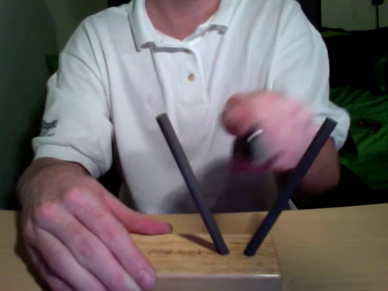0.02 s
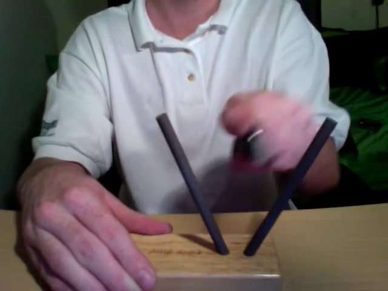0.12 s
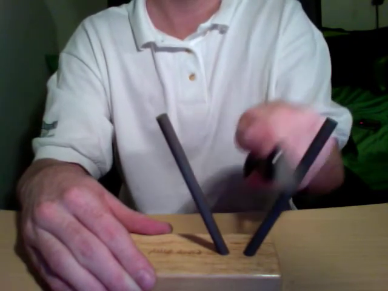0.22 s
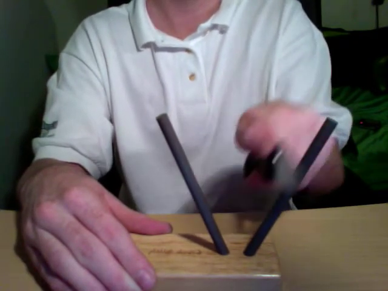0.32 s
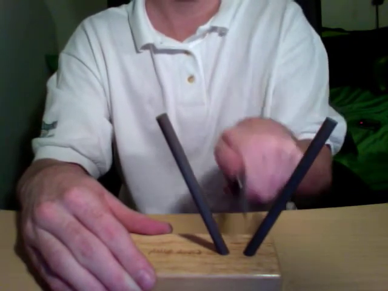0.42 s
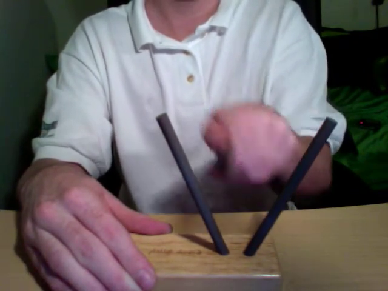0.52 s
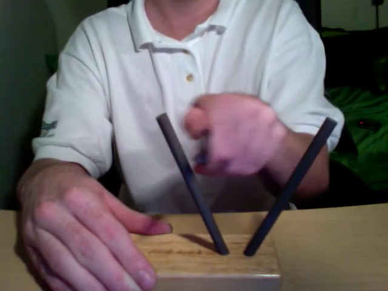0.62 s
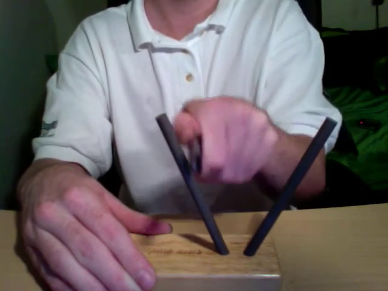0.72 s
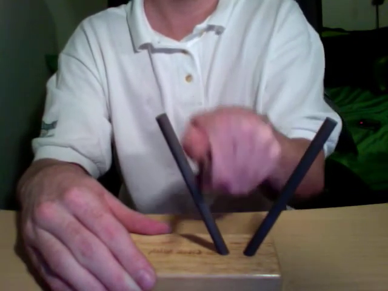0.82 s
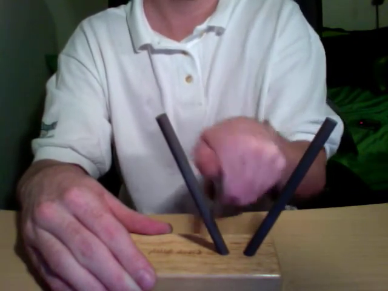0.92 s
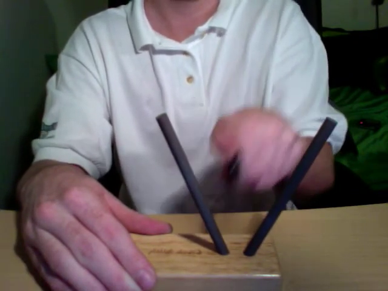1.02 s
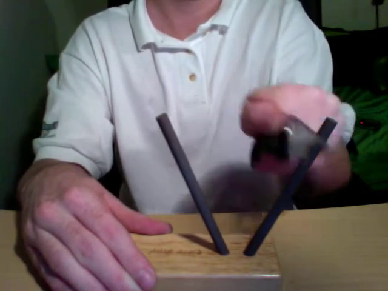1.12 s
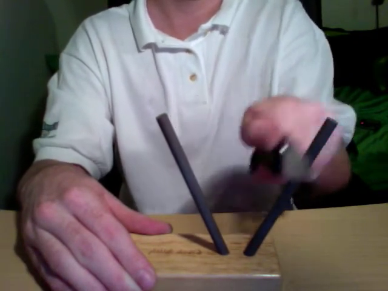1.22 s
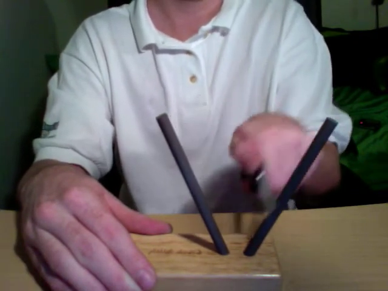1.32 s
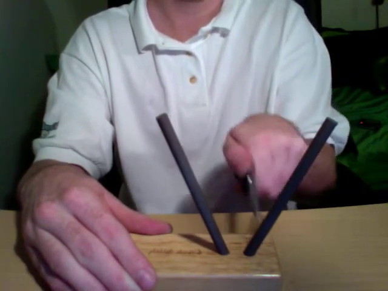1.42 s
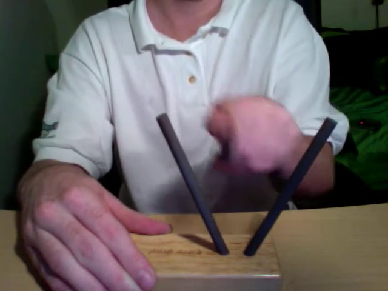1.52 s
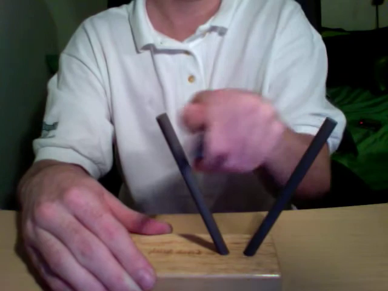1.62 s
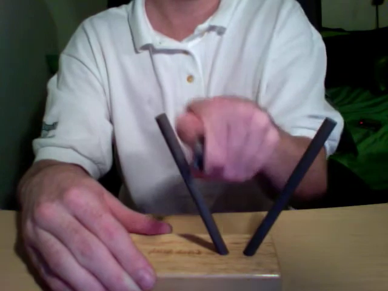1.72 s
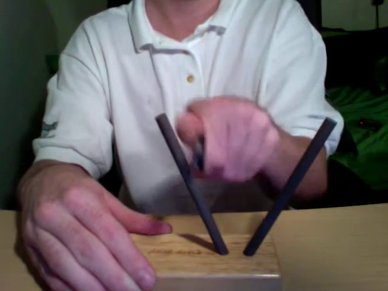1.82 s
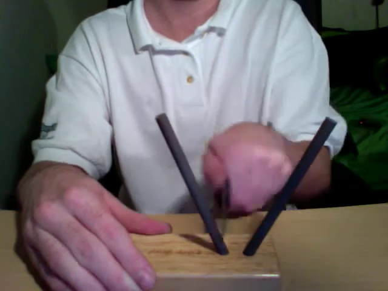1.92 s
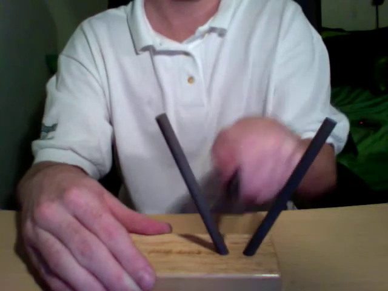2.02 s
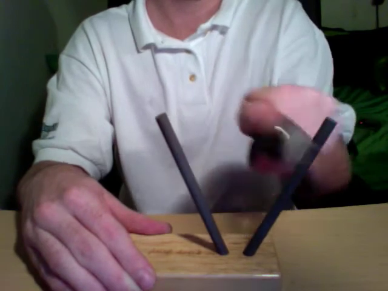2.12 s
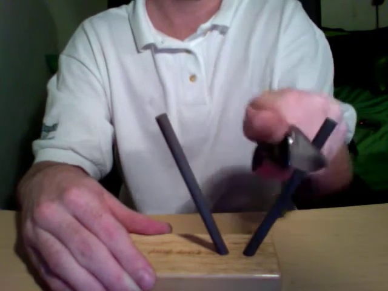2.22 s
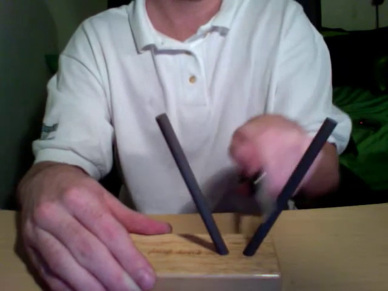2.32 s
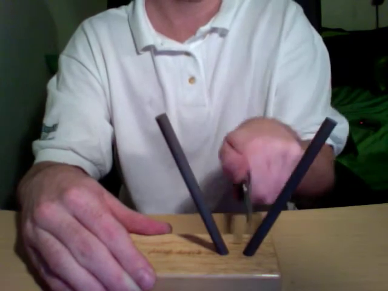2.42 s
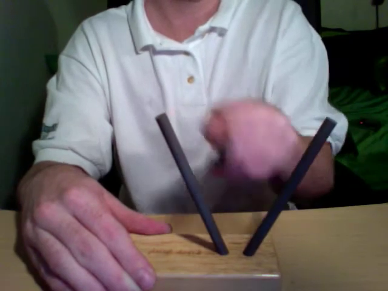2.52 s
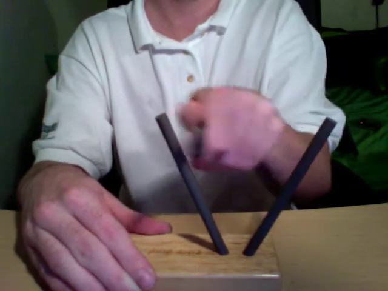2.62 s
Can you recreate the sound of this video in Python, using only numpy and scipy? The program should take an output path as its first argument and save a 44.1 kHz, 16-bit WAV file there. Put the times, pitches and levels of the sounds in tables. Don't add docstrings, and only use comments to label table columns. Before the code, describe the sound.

Close in a small room with faint hum, a knife clicks onto a ceramic rod, scrapes down with a brightening metallic song, lifts, then repeats on the other rod, right strokes harder than left.

```python
import sys
import numpy as np
from scipy import signal
from scipy.fft import rfft, irfft, next_fast_len
from scipy.io import wavfile
from scipy.ndimage import uniform_filter1d, map_coordinates

SR = 44100
rng = np.random.default_rng(int(sys.argv[2]) if len(sys.argv) > 2 else 0)


def to_linear_factor(level_db):
    exponent = np.asarray(level_db, float) / 20
    return 10 ** exponent


def int16_out(signal):
    q = np.round(np.clip(np.atleast_2d(signal).T, -1, 1) * 32767)
    wavfile.write(sys.argv[1], SR, q.astype(np.int16))


N = 119070
LEAD = SR // 4
M = N + LEAD
T_S = (np.arange(M) - LEAD) / SR

# hz, db_per_hz
AIR_COLOUR = [(40, -27.5), (120, 0.5), (240, 0), (400, -5.5), (650, -1.5), (1100, -11.5), (3200, -20),
              (16000, -42)]
AIR_DB = -74
HUM_HZ, HUM_WIDTH_HZ, HUM_DB = 231, 24, -74
# hz, t60_s
ROOM_DECAY = [(200, .3), (2000, 0.23), (6000, .2), (14000, 0.17)]
ROOM_DB = -11

# start_s, peak_db, block_thump_db
LANDINGS = [
    (.2262, -2.5, -13),
    (.7133, -13, -17),
    (1.2212, -6, -12.5),
    (1.7036, -9.5, -12),
    (2.2312, -2.5, -15.5),
]
# delay_s, level_db
RETOUCHES = [
    [(.0008, 9), (.019, -35)],
    [(.0021, 9), (.018, -19)],
]
# pitch_hz, level_db, t60_s
STRUCK_MODES = [
    [(809, -10.5, 0.035), (1430, -13, .008), (1644, -4, 0.015), (1790, -4, .012), (2712, -2, .016),
     (3935, -1.5, 0.011), (4194, 0, 0.011), (4850, -4.5, 0.0081), (6270, -23, 0.024), (8870, -17.5, .006)],
    [(650, -16.5, 0.042), (833, -14, 0.048), (1910, -15, 0.029), (1780, -3, 0.021), (2700, -8, 0.038),
     (3370, -11.5, 0.02), (4030, -8, 0.011), (5480, 8.5, 0.0023), (6690, -8, 0.0039), (9400, -14, 0.0085)],
]
# pitch_hz, level_db, t60_s
BLOCK_MODES = [(150, -9, 0.03), (180.5, -1.5, 0.081), (215, -7.5, 0.081), (305, -9, 0.068),
               (458, -13, 0.043)]

# time_s, rasp_level_db, blade_song_over_rasp_db, rod_drone_over_rasp_db
STROKES = [
    [(.246, -42.5, 1.5, 10), (.31, -45.5, 6.5, -4), (.345, -46.5, 12.5, 8), (.375, -46, 18, 1.5),
     (.42, -54, 18.5, 22.5), (.464, -52.5, 10.5, 6)],
    [(.732, -46, -1, 1), (.76, -49, 5.5, 14.5), (.81, -53.5, 12.5, 12.5), (.85, -53, 19, 15),
     (.9, -55, 20, 19), (.95, -61.5, 20, 16)],
    [(1.24, -46, 12, 12), (1.27, -50.5, 12.5, 4), (1.35, -47.5, 9.5, 11.5), (1.4, -52.5, 22.5, 8),
     (1.43, -49, 10.5, 5), (1.452, -53.5, 8.5, 10.5)],
    [(1.724, -44.5, -10, 6), (1.76, -49, -5, -12), (1.8, -51.5, 9, 12), (1.89, -49.5, 20, 6.5),
     (1.94, -54.5, 18.5, 15.5), (1.975, -59, 16.5, 20.5)],
    [(2.25, -50.5, -3, 15.5), (2.3, -44, 10, -1.5), (2.35, -48.5, 7.5, 7.5), (2.41, -48, 20.5, 7.5),
     (2.44, -51.5, 15.5, 7.5), (2.463, -49, 1.5, 4.5)],
]
# pitch_hz, width_hz, level_db
RUBBED_MODES = [
    [(657.7, 99, -8.5), (814.6, 210, -4), (1129.5, 27, -12.5), (2690, 40, -4.5), (3200, 220, -30),
     (4150, 100, -4.5), (5267, 740, -4.5), (5860, 190, -9.5), (8180, 300, -15), (8720, 670, -14)],
    [(384, 100, -13.5), (616, 40, -15.5), (845, 175, -2.5), (1093, 76, -15), (3123, 75, -12),
     (3647, 250, -15), (5430, 440, -17), (6600, 600, -9), (9140, 170, -29)],
]
# pitch_hz, width_hz, level_db
BLADE_MODES = [(1706, 150, -8), (1770, 52, 0.5), (1880, 170, -0.5), (2130, 210, 0.5), (2450, 130, 0),
               (2660, 140, -3)]
# stroke_share, centre_hz
SONG_CLIMB = [
    [(0, 1390), (.5, 1648), (.8, 2450), (1, 2700)],
    [(0, 1680), (.62, 1623), (1, 2294)],
]
# pitch_hz, width_hz, level_db
TIP_FIZZ = [(8880, 900, -9.5), (13600, 1700, -11.5)]
# hz, db_per_hz
GRIT_COLOUR = [(110, -35), (230, -3.5), (1500, -12.5), (4300, -4), (6500, -17), (10000, -20.5),
               (13000, -22.5), (16000, -31.5)]
# hz, db_per_hz
SWELL_COLOUR = [(250, -31), (600, -7), (1300, -8), (2200, -0.5), (3800, -10), (5000, -26.5), (8000, -64)]
GRIT_DB, SWELL_DB = 1.5, -4.5
CLIMB_OCTAVES, CLIMB_FLOOR_DB = .13, -14
TIP_FROM_SHARE, TIP_SONG_DB = 0.82, 1
DRONE_TOP_HZ, SONG_BAND_HZ = 1300, (3000, 4000)
SKIP_S, SKIP_DB = 0.045, -4
LIFT_S = 0.0066
EARLIER_END_S, EARLIER_DB = 0.0015, -49.5
LEAST_WIDTH = .045
MIC_LOW_HZ, MIC_TOP_HZ = 115, 15700


def unit(x):
    return x / np.sqrt(np.mean(x ** 2) + 1e-20)


def along(points, hz):
    point_hz, value = np.transpose(points)
    return np.interp(np.log(hz + 1), np.log(point_hz + 1), value)


def wobble(rate_hz):
    knots = rng.standard_normal(int(M * rate_hz / SR) + 4)
    return map_coordinates(knots, [np.arange(M) * rate_hz / SR])


def coloured(x, spectrum):
    size = next_fast_len(M + 8192)
    gain = to_linear_factor(along(spectrum, np.fft.rfftfreq(size, 1 / SR)))
    return irfft(rfft(x, size) * gain, size)[:M]


def mode(x, hz, width_hz):
    width_hz = max(width_hz, LEAST_WIDTH * min(hz, 4000))
    b, a = signal.iirpeak(hz, hz / (1.5 * width_hz), SR)
    twice = signal.lfilter(b, a, signal.lfilter(b, a, x))
    return twice / np.sqrt(.75 * np.pi * width_hz / SR)


def air():
    hiss = unit(coloured(rng.standard_normal(M), AIR_COLOUR))
    hum = mode(rng.standard_normal(M), HUM_HZ, HUM_WIDTH_HZ)
    return to_linear_factor(AIR_DB + 1.2 * wobble(8)) * hiss + to_linear_factor(HUM_DB) * hum


def room(x):
    out, step = np.zeros(M + 2 * SR), SR // 16
    for i in range(0, M, step):
        hz, t, z = signal.stft(rng.standard_normal(SR // 2), SR, nperseg=256)
        decay = to_linear_factor(-60 * t / along(ROOM_DECAY, hz)[:, None])
        tail = signal.istft(z * decay, SR, nperseg=256)[1]
        wet = signal.fftconvolve(x[i:i + step], tail / np.linalg.norm(tail))
        out[i + 200:][:len(wet)] += wet
    return out[:M]


def ring(modes, attack_s):
    t = np.arange(SR // 5) / SR
    tone = 0
    for hz, db, t60_s in modes:
        tone = tone + to_linear_factor(db + rng.normal(0, 0.97) - 60 * t / t60_s) * np.sin(2 * np.pi * hz * t)
    return tone * (1 - np.exp(-t / attack_s))


def click(modes):
    tone = ring(modes, attack_s=.0003)
    n = len(tone)
    crack = to_linear_factor(-60 * np.arange(n) / SR / 0.0085) * rng.standard_normal(n)
    band = signal.butter(2, [1200, 6000], "band", fs=SR, output="sos")
    return tone + 0.97 * signal.sosfilt(band, crack) + .15 * crack


def landings():
    out = np.zeros(M + SR)

    def place(sound, start_s, db):
        out[LEAD + round(start_s * SR):][:len(sound)] += to_linear_factor(db) * sound

    for k, (start_s, peak_db, thump_db) in enumerate(LANDINGS):
        rod = k % 2
        for delay_s, touch_db in [(0.00025, 0.03)] + RETOUCHES[rod]:
            place(click(STRUCK_MODES[rod]), start_s + delay_s, peak_db + touch_db - 16.5)
        place(ring(BLOCK_MODES, attack_s=.005), start_s + .002, peak_db + thump_db)
    return out[:M]


def patchy(x, depth_db):
    z = signal.stft(x, nperseg=256)[2]
    field = uniform_filter1d(rng.standard_normal(z.shape), size=7, axis=0)
    field = uniform_filter1d(field, size=20, axis=1)
    return unit(signal.istft(z * to_linear_factor(depth_db * unit(field)), nperseg=256)[1][:M])


def scrape(grainy):
    grains = (rng.random(M) < 3000 / SR) * rng.standard_normal(M)
    catches = to_linear_factor(.8 * wobble(150) + .6 * wobble(35))
    return unit((rng.standard_normal(M) + grainy * unit(grains)) * catches)


def stroke(k, on, grit, swell, drive):
    rod, t = k % 2, T_S[on]
    time_s, level_db, song_db, drone_db = np.transpose(STROKES[k])
    share = (t - time_s[0]) / (time_s[-1] - time_s[0])
    lift = np.exp(-np.maximum(t - time_s[-1], 0) / LIFT_S)
    touch = np.where(t < t[0] + SKIP_S, to_linear_factor(SKIP_DB), 1) * lift
    press = touch * to_linear_factor(np.interp(t, time_s, level_db))
    song, drone = np.interp(t, time_s, song_db), np.interp(t, time_s, drone_db)
    out = press * (to_linear_factor(GRIT_DB) * grit + to_linear_factor(SWELL_DB + song) * swell)

    for hz, width_hz, db in RUBBED_MODES[rod]:
        follow = 0
        if hz < DRONE_TOP_HZ:
            follow = drone
        elif SONG_BAND_HZ[0] < hz < SONG_BAND_HZ[1]:
            follow = song
        gain = to_linear_factor(db + follow + 3.5 * wobble(25)[on])
        out += mode(press * gain * drive, hz, width_hz)

    tip = np.clip((share - TIP_FROM_SHARE) / (1 - TIP_FROM_SHARE), 0, 1)
    for hz, width_hz, db in TIP_FIZZ:
        gain = np.sqrt(tip) * to_linear_factor(db + 1.8 * wobble(30.76)[on])
        out += mode(press * gain * drive, hz, width_hz)

    centre_hz = np.interp(share, *np.transpose(SONG_CLIMB[rod]))
    for hz, width_hz, db in BLADE_MODES:
        near = np.exp(-.5 * (np.log2(hz / centre_hz) / CLIMB_OCTAVES) ** 2) + to_linear_factor(CLIMB_FLOOR_DB)
        gain = near * to_linear_factor(db - 5.5 + TIP_SONG_DB * tip + song + 2.5 * wobble(40)[on])
        out += mode(press * gain * drive, hz, width_hz)
    return out


def rasp():
    grit = patchy(coloured(scrape(grainy=.3), GRIT_COLOUR), depth_db=5.0)
    swell = unit(coloured(scrape(grainy=0.49), SWELL_COLOUR))
    drive = scrape(grainy=0.76)
    out = to_linear_factor(EARLIER_DB) * (T_S < EARLIER_END_S) * (swell + 0.45 * grit)
    for k, rows in enumerate(STROKES):
        start = LEAD + int(LANDINGS[k][0] * SR)
        end = min(M, LEAD + int((rows[-1][0] + .12) * SR))
        on = slice(start, end)
        out[on] += stroke(k, on, grit[on], swell[on], drive[on])
    return out


def scene():
    knife = rasp() + landings()
    return (knife + to_linear_factor(ROOM_DB) * room(knife) + air())[None, LEAD:]


def band_limit(x):
    return signal.sosfilt(signal.butter(12, 16820, fs=SR, output="sos"), x)


def record(dry):
    low_cut = signal.butter(4, MIC_LOW_HZ, "high", fs=SR, output="sos")
    top_cut = signal.ellip(8, 1, 60, MIC_TOP_HZ, fs=SR, output="sos")
    mix = signal.sosfilt(top_cut, signal.sosfilt(low_cut, dry))
    return band_limit(mix)


dry = scene()
out = record(dry)
int16_out(out)
```